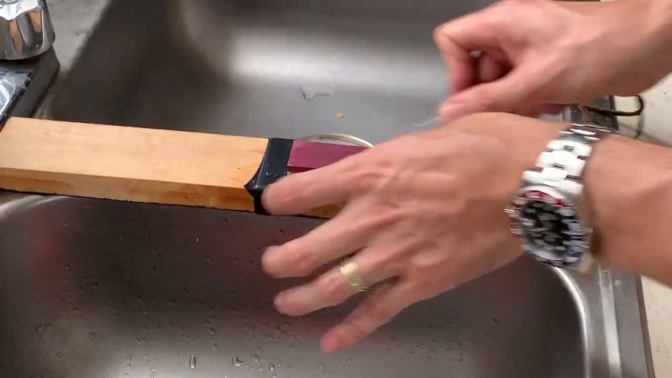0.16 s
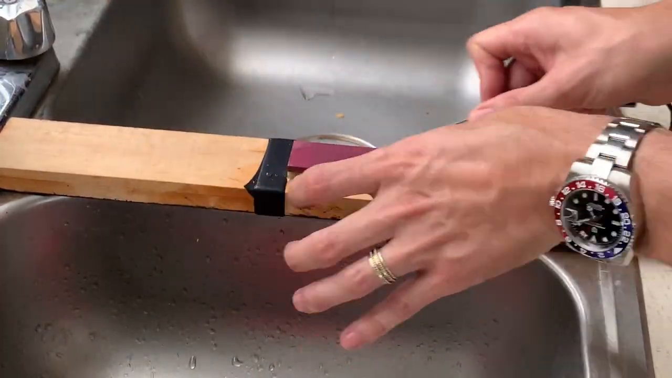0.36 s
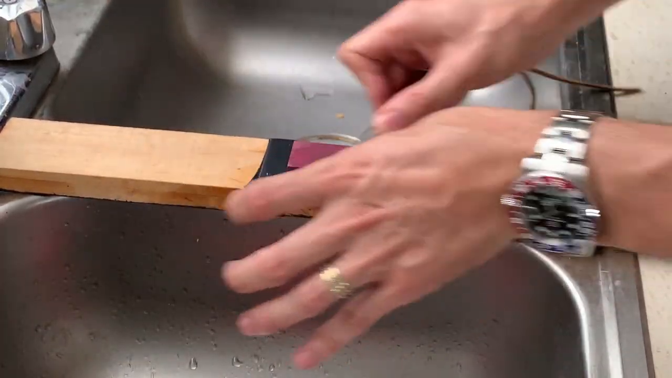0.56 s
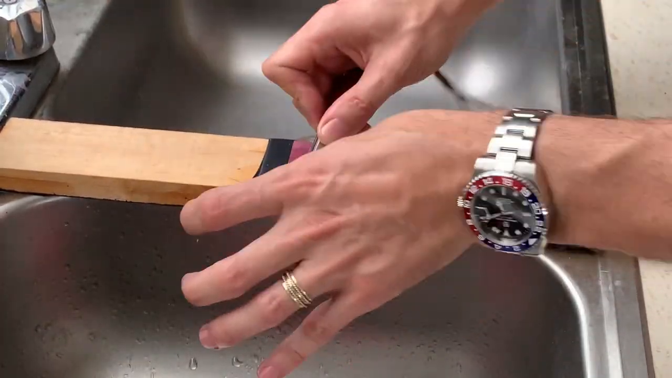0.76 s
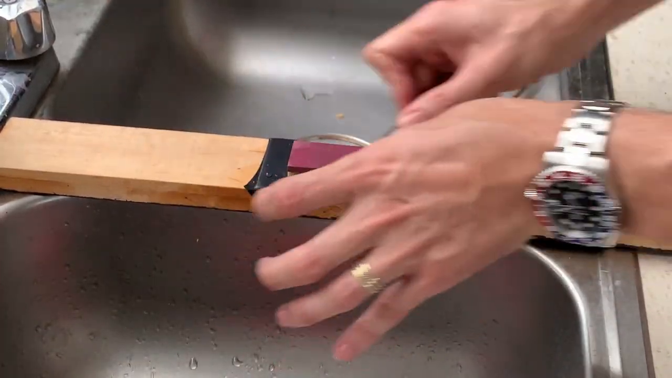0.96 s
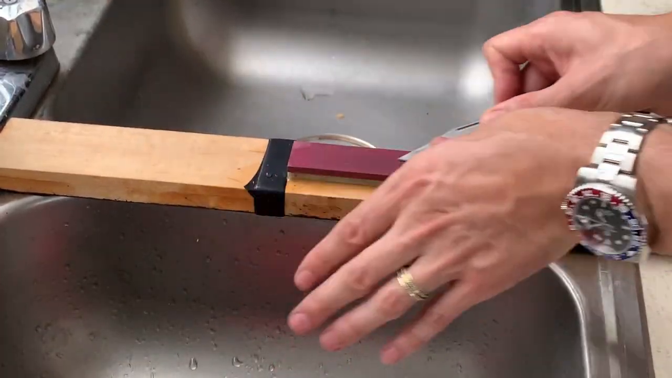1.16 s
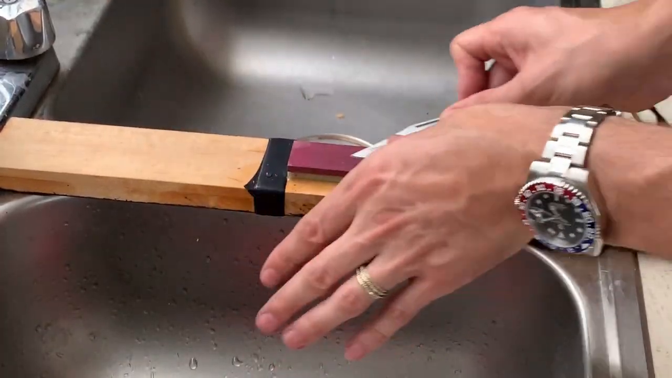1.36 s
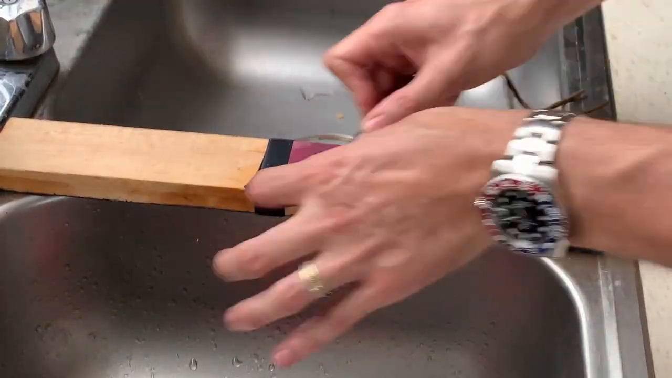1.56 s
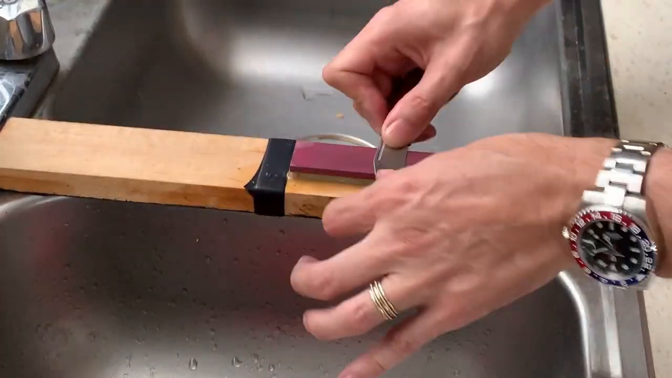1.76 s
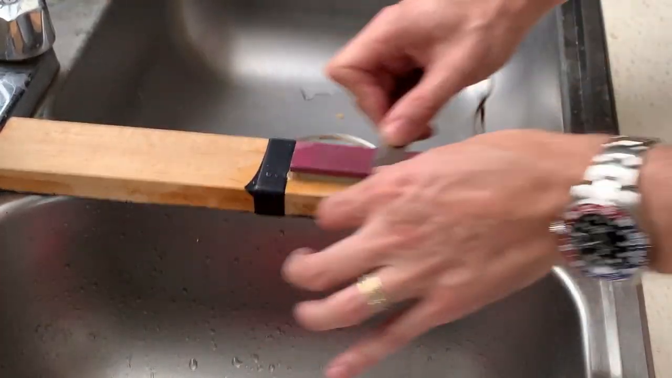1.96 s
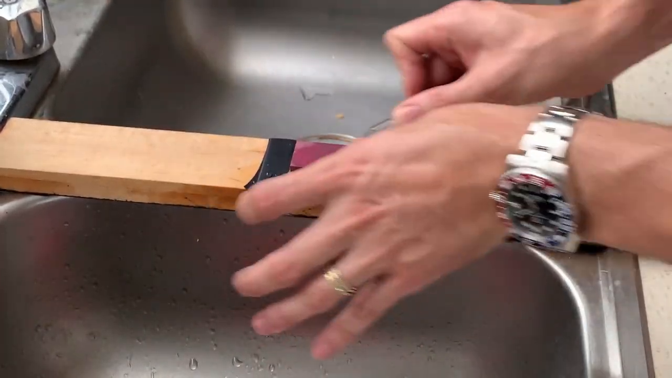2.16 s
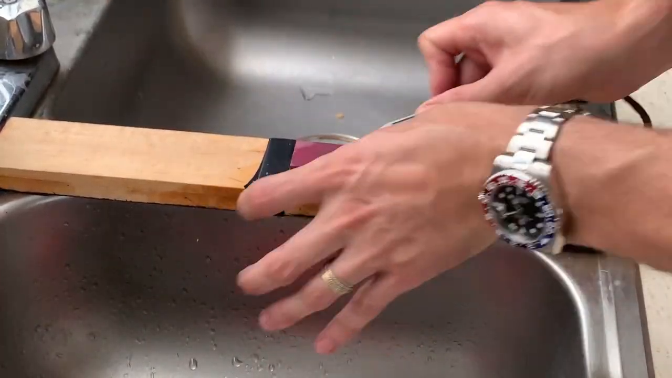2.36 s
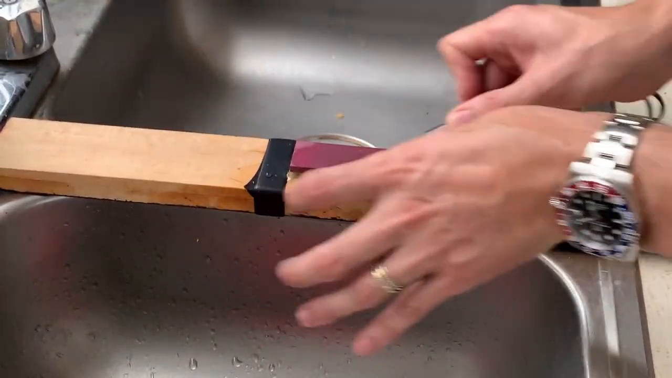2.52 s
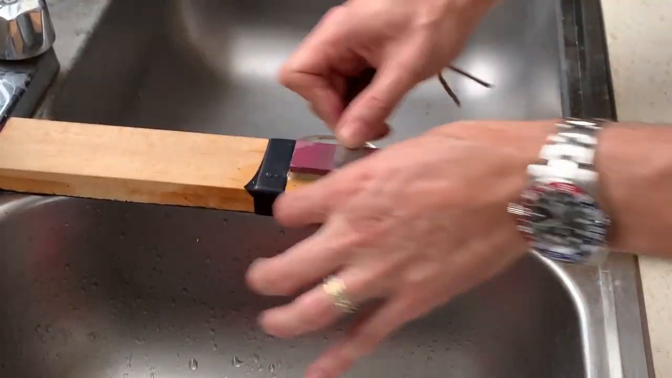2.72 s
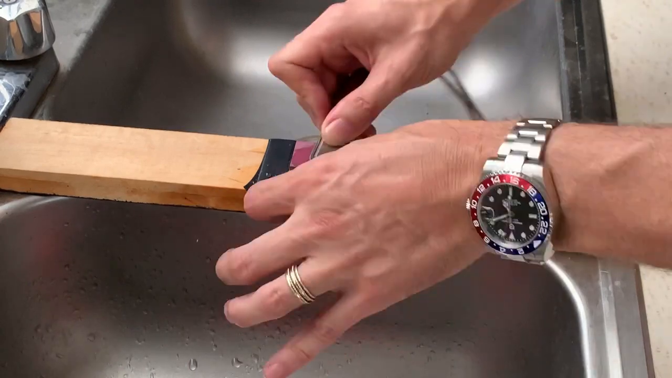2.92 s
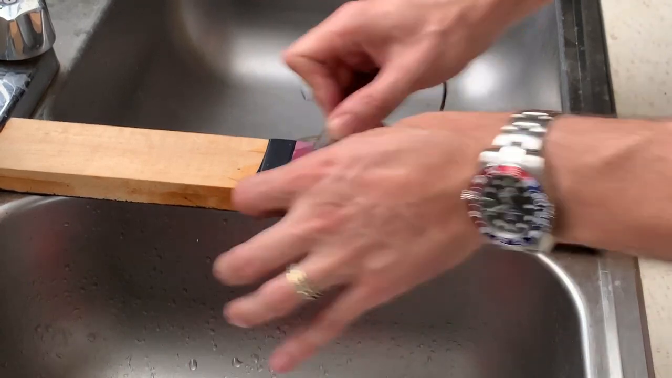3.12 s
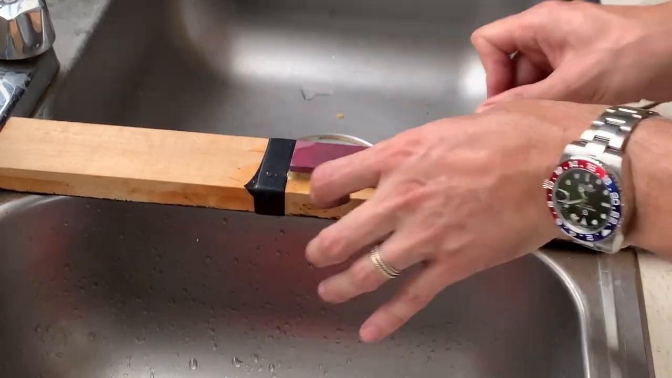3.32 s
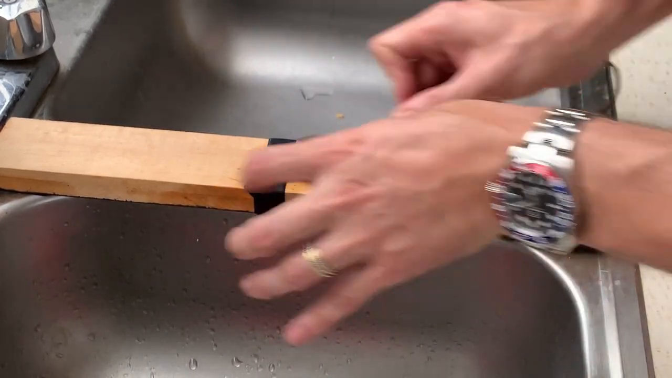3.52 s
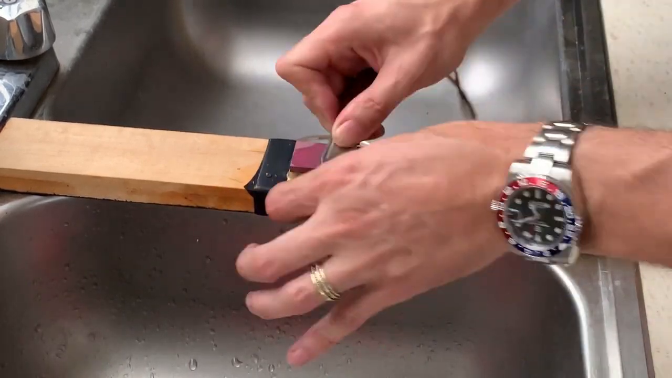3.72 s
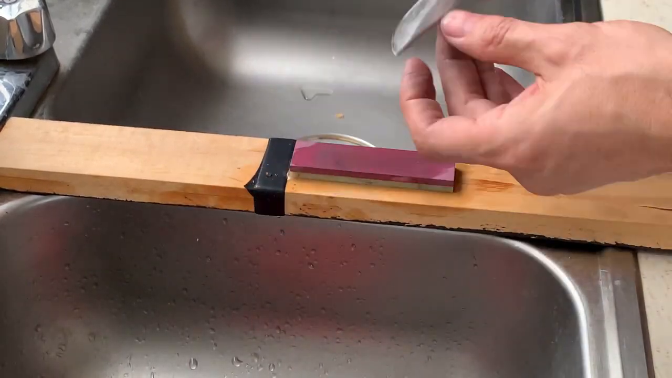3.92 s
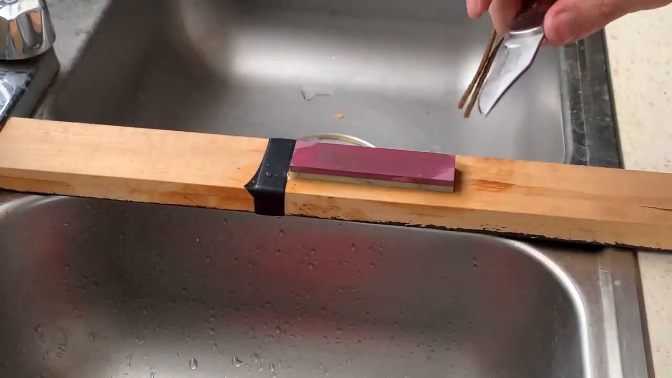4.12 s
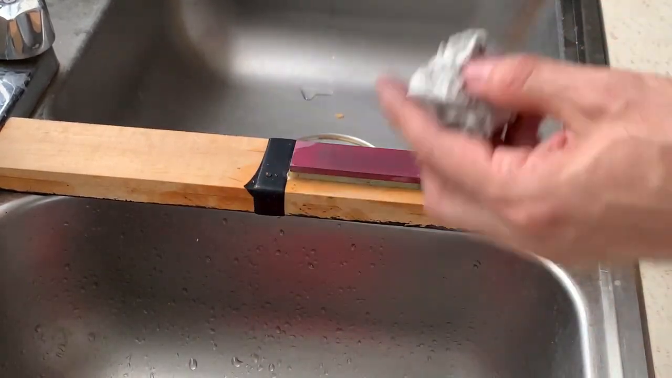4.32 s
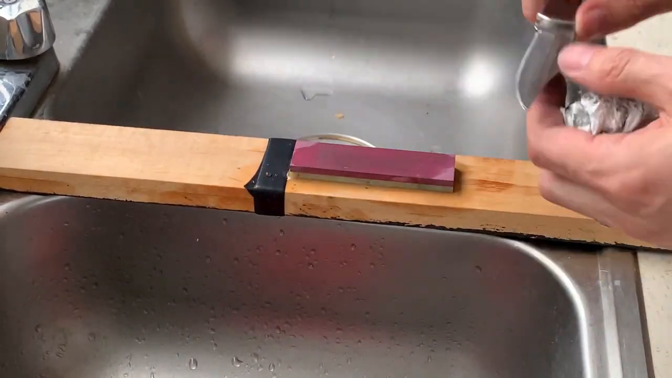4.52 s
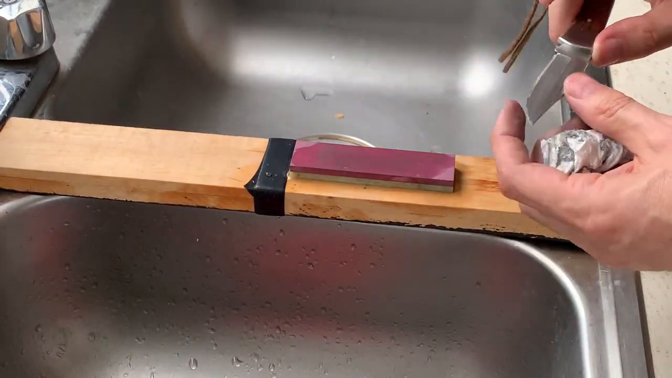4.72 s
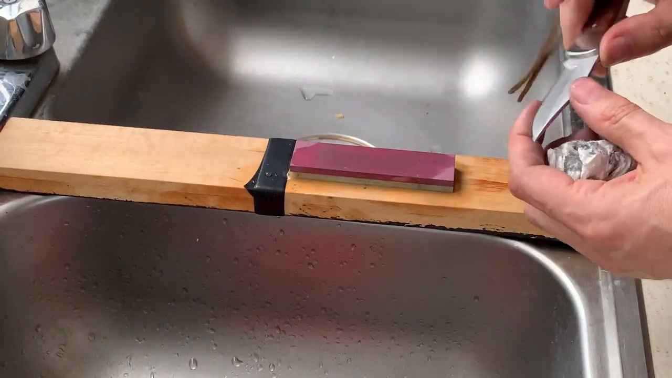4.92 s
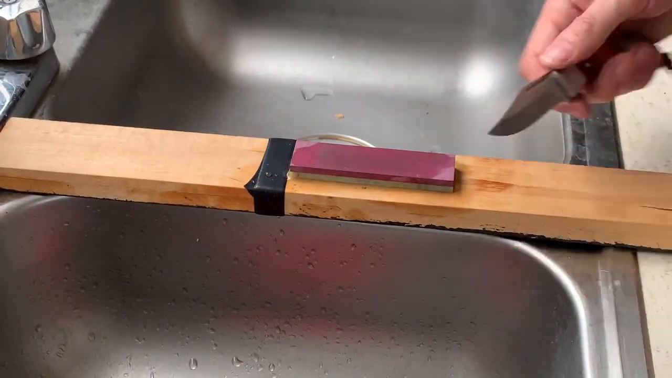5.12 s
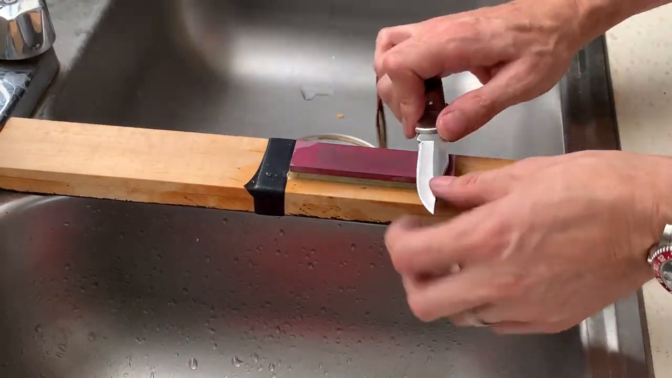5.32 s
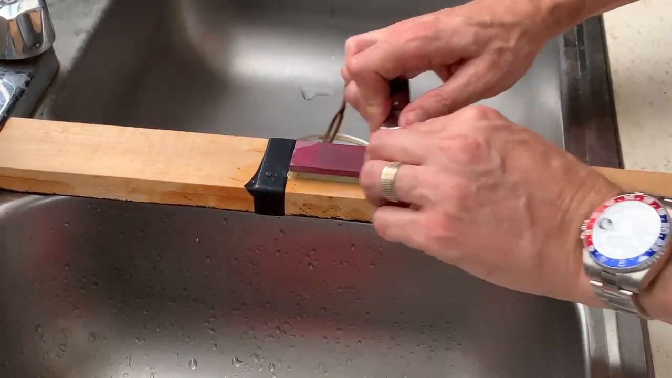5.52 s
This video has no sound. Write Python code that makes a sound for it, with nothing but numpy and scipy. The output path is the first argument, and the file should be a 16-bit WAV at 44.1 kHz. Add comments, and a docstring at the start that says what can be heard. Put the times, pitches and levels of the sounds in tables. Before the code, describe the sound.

A knife blade scrubs rapidly on a whetstone with a gritty, chattering rasp, pauses, then taps down and briefly resumes.

```python
"""Knife on a whetstone

A small knife is scrubbed on a stone fixed to a board across a steel sink, about 21 strokes a second,
while the contact sweeps along the edge and back once a second. Crushed grit hisses, and stick-slip
friction makes the edge chatter on every push, at times catching hard. The blade is lifted, handled
with a paper towel and set down with a tap; the scrubbing resumes briefly in the quiet kitchen."""
import sys
import numpy as np
from scipy import signal
from scipy.fft import rfft, irfft, next_fast_len
from scipy.io import wavfile
from scipy.ndimage import uniform_filter1d

SR = 44100
rng = np.random.default_rng(int(sys.argv[2]) if len(sys.argv) > 2 else 0)


def unload_audio(sound):
    """Save the sound as a 16-bit wav file, at the path given as the first command line argument."""
    columns = np.transpose(np.atleast_2d(sound))
    # keep every value between -1 and 1, then stretch to whole-number steps
    steps = np.round(np.clip(columns, -1, 1) * 32767)
    wavfile.write(sys.argv[1], SR, steps.astype(np.int16))


N = 250488
TIME = np.arange(N) / SR
FFT_SIZE = next_fast_len(N + SR // 4)
HZ = np.fft.rfftfreq(FFT_SIZE, 1 / SR)

# The hand's pace in each spell of scrubbing: t/s, half strokes done (odd push, even pull)
HAND_PACE = [
    [(0.006, 1), (0.275, 12), (1.213, 52), (1.437, 62), (2.505, 107), (2.891, 123), (3.545, 151),
     (3.901, 166)],
    [(5.52, 1), (5.595, 2), (5.685, 5)],
]
# The slow sweep in each spell: t/s, place of contact (0 belly, 1 tip), pressure/dB
EDGE_SWEEP = [
    [(0.05, 0.45, 1), (0.22, 0.14, -2.5), (0.48, 0.3, -1.5), (0.72, 0.91, -1), (0.87, 0.54, 0.5),
     (1.38, 0.22, -2), (1.68, 0.74, -1), (2.0, 0.8, -1), (2.3, 0.0052, 1), (2.64, 0.27, 0), (2.75, 1, -2.5),
     (2.86, 0.66, 0), (3.15, 0.65, 0), (3.42, 0, -0.5), (3.6, 0.38, -0.5), (3.8, 0.91, 0), (3.9, 0.53, 1)],
    [(5.55, 0, 5), (5.595, 0.21, -1), (5.645, 0.92, 3.5), (5.68, 1, -8)],
]
# Edge on the stone: start/s, end/s
CONTACT_SPANS = [(-.05, 3.902), (5.527, 5.75)]
# Envelopes of the continuous friction: t/s, level/dB
HISS_LEVEL = [(0, -44.5), (.22, -51), (.37, -51), (.52, -47.5), (.75, -48), (1.0, -48), (1.27, -49.5),
              (1.42, -49.5), (1.6, -46.5), (1.76, -46), (1.95, -48), (2.42, -49), (2.6, -49), (2.72, -47),
              (2.96, -45), (3.15, -48), (3.3, -47.5), (3.45, -50), (3.56, -48.5), (3.75, -47), (3.9, -47),
              (5.54, -47), (5.593, -51), (5.645, -41.5), (5.68, -43.5)]
RASP_LEVEL = [(0, -49), (.3, -56), (.52, -42), (.75, -59), (.95, -66), (1.06, -44.5), (1.38, -60.5),
              (1.55, -42.5), (1.7, -49), (1.95, -65), (2.1, -64), (2.19, -44), (2.42, -48.5), (2.64, -43.5),
              (2.73, -53), (2.82, -43.5), (2.92, -50), (3.0, -57), (3.22, -57.5), (3.35, -47.5),
              (3.45, -54.5), (3.9, -58.5)]
THRUM_LEVEL = [(0, -62), (1.4, -62.5), (2.0, -57), (2.35, -63.5), (2.62, -58.5), (3.15, -55), (3.6, -64),
               (3.83, -50.5), (3.9, -66)]
# Pushes on which the edge catches: t/s, level/dB, relative level of the crack/dB, build-up/s
HARD_CATCHES = [(0.014, -24.5, -21, .007), (.066, -31.5, -9.5, .011), (.118, -28.5, -11, 0.0086),
                (0.2619, -26.5, -14.5, 0.008), (.311, -29.5, -9, 0.0077), (0.400, -25.5, -15, 0.0073),
                (0.4495, -31.5, -2.5, .009), (.496, -37.5, -4.5, .008), (0.5216, -27.5, -15.5, .004),
                (0.5403, -29.5, -5.5, .011), (.617, -27, -12.5, 0.00827), (0.727, -32.5, -17, .007),
                (0.8324, -21, -13, .005), (0.8707, -25.5, -11, 0.0077), (1.061, -26, -23, .012),
                (1.194, -23, -25.5, 0.00559), (1.2433, -25, -22.5, 0.0078), (1.318, -28, -12.5, 0.005),
                (1.4727, -22, -23, 0.0077), (1.518, -25, -28, 0.0074), (1.564, -35.5, 3, 0.011),
                (1.663, -27, -6, .011), (1.7669, -24, -7.5, 0.0069), (1.858, -21.5, -9.5, 0.0072),
                (2.082, -25.5, -19, .005), (2.139, -29, -18, 0.012), (2.186, -32, -11.5, 0.011),
                (2.234, -28.5, -10, 0.0077), (2.279, -25.5, -10, 0.01), (2.326, -26, -11.5, 0.0097),
                (2.379, -29, -7, 0.015), (2.421, -31, -8.5, .01), (2.469, -27, -12, .011),
                (2.510, -27, -9.5, 0.0083), (2.568, -27, -7, 0.01), (2.6158, -28, -7.5, 0.0074),
                (2.663, -31, -12.5, .008), (2.8076, -20.5, -8.5, .008), (2.8601, -18.5, -13.5, .006),
                (2.907, -22.5, -6, .01), (2.924, -31, -7.5, .008), (2.948, -33, -4.5, 0.0071),
                (3.003, -28.5, -9, 0.0083), (3.123, -26, -13.5, 0.0075), (3.1701, -24.5, -13, .007),
                (3.217, -28, -21, .005), (3.259, -26.5, -18, 0.0076), (3.326, -26.5, -16.5, 0.0078),
                (3.4151, -26, -27, 0.0068), (3.461, -23.5, -19, 0.0071), (3.504, -25, -16.5, 0.0079),
                (3.557, -22, -13, 0.0105), (3.706, -23, -9, 0.0075), (3.7989, -19, -16, .006),
                (5.536, -29.5, -25, 0.0059), (5.561, -27, -13.5, 0.0069), (5.615, -24.5, -17, 0.008),
                (5.6596, -24, -16.5, .004)]
# Friction tones: t/s, level/dB
CLEAR_SINGS = [(.059, -41), (.107, -40.5), (.483, -40.5), (.53, -41.5), (.866, -37), (1.184, -35.5),
               (2.13, -39), (2.323, -35.5), (2.372, -39.5), (2.423, -39), (2.464, -41), (2.513, -36.5),
               (3.163, -44), (3.496, -42.5)]
SQUEAKS = [(0.012, -37), (1.851, -36.5), (2.32, -40), (2.373, -36), (3.555, -34), (3.703, -34)]
# Brief impacts: t/s, level/dB, decay/s
GRAIN_SNAPS = [(.0145, -33, 0.0032), (.8715, -30, 0.003), (1.8545, -26, 0.0023), (2.081, -41, 0.0016),
               (2.8045, -26, 0.005), (2.8575, -36.5, 0.0033), (2.906, -31, .005), (3.705, -34, .003),
               (3.7995, -29.5, 0.0042), (5.566, -32.5, .001)]
STONE_KNOCKS = [(.209, -45, .004), (.405, -41, .004), (.87, -42, .005), (1.015, -40, 0.008),
                (1.187, -41, 0.0056), (1.471, -33, 0.005), (1.522, -33.5, 0.006), (2.083, -40, 0.005),
                (2.131, -40.5, .005), (3.405, -40, .005), (3.46, -39, .005), (3.508, -43, .005)]
LANDING_TAPS = [(5.3342, -26.5, 0.0023), (5.339, -36, 0.009), (5.35, -43, 0.0064), (5.370, -47, 0.002),
                (5.398, -51.5, 0.0059), (5.411, -53, 0.0046)]
# Fingers and paper on the blade: t/s, duration/s, swish level/dB, bump level/dB
TOUCHES = [(4.253, 0.0062, -70, -72), (4.24, 0.062, -78.5, -68), (4.352, 0.054, -88, -59.5),
           (4.391, 0.066, -91, -63.5), (4.475, 0.056, -73, -71), (4.55, .035, -92, -66),
           (5.214, 0.013, -75, -73.5)]

# Broad spectra of the sources: f/Hz, relative spectral level/dB
BOARD_SPECTRUM = [(30, -39.5), (130, -51), (230, -26), (340, -6.5), (700, 2.5), (1080, -5.5), (1450, 5),
                  (1950, -4.5), (2300, -5.5), (2950, -15.5), (4500, -21.5), (9000, -45.5)]  # stone and board together
GRIT_SPECTRUM = [(300, -24.5), (1500, -17.5), (3200, -10), (4400, -7.5), (5500, 0), (6600, 4), (7600, -2),
                 (9500, 2), (11200, -8.5), (12800, -7.5), (14000, -2.5), (14600, -5.5), (16000, -7.5)]
RASP_SPECTRUM = [(600, -37), (1500, -11.5), (2100, 3.5), (2500, -3), (2900, -8.5), (3600, -24.5),
                 (6000, -30)]
SINK_SPECTRUM = [(30, -31), (140, -39), (190, -9), (250, -3.5), (310, 6), (450, -14), (1200, -60)]
SNAP_SPECTRUM = [(200, -14.5), (900, -11), (2200, 14.5), (2700, 3), (3600, -1), (5000, -1), (8000, -1),
                 (16000, -15.5)]
TAP_SPECTRUM = [(100, -52), (200, -34), (450, -22), (1000, -15.5), (1450, 1), (1750, 3.5), (2150, -14),
                (3200, -17), (4400, -16.5), (5300, -24), (8300, -22), (11000, -35), (16000, -32)]
SKID_SPECTRUM = [(800, -15), (2800, -3), (4000, 0), (6300, -1), (9000, -11), (15000, -16)]
SWISH_SPECTRUM = [(500, -13), (2500, -7), (5000, -6), (9000, -5.5), (15000, -6.5)]
BUMP_SPECTRUM = [(60, -36), (200, -24), (420, 10), (700, -3), (1300, -19), (4000, -39)]
AIR_SPECTRUM = [(15, -71), (25, -36), (160, -36.5), (183, -18.5), (297, -14.5), (378, -2), (537, -3),
                (582, -7.5), (631, -3.5), (782, -9), (919, -10), (1110, -13), (2490, -29), (15500, -40)]
HOLLOW_SPECTRUM = [(100, -40.5), (300, -6.5), (620, -3.5), (1000, -11), (3000, -38)]
# Resonances of the bodies: f/Hz, bandwidth/Hz, lift/dB
CONTACT_RESONANCES = [(403.4, 36.7, 17.33), (466, 13, 7.6), (542.5, 18, 7.8), (623.3, 22.6, 7.9),
                      (924, 54.4, 15.9), (1145, 42, 8.1), (1273, 43, 8.5), (1701, 108, 13.94),
                      (2112, 210, 7.8), (2734, 86, 13), (3076, 48, 8.5)]  # stone and board with the blade pressed on them
BLADE_RESONANCES = [(3506, 110, 13.1), (3930, 150, 11), (4720, 70, 9.6), (4825, 45, 6), (5220, 47, 13),
                    (5290, 57, 7.5), (5760, 90, 7), (6380, 50, 7.8), (6550, 240, 4.9), (6820, 44, 6),
                    (7300, 80, 5.2), (7260, 130, 6), (8195, 130, 9), (8730, 110, 7.2), (9050, 77, 9),
                    (9310, 110, 10.3), (9520, 70, 9.8), (9930, 100, 4.5), (10750, 110, 8.2),
                    (11900, 116, 5.5)]
SINK_RESONANCES = [(191.8, 11, 16), (235, 19, 8.9), (279.7, 12, 14)]
HOLLOW_RESONANCE = [(407.3, 37, 21)]  # the board's hollow ring
# Free vibration after the blade lands: f/Hz, level/dB, T60/s
LANDING_MODES = [(1390, -56, .04), (1630, -54, .035), (2710, -49, 0.1)]
# Changes of colour: f/Hz, gain/dB
BELLY_GAIN = [(2500, -2), (4100, -0.5), (5500, 0.5), (9000, -1)]  # grit under the belly
NEW_ANGLE_GAIN = [(200, -1), (400, -3.5), (850, 2), (1700, -0.5), (2200, 1.5), (2700, -2), (3700, 4.5),
                  (6000, -1.5), (8000, -3), (9300, -9), (11000, -2), (15000, -4)]  # scrubbing after the blade is set down again
MICROPHONE_GAIN = [(40, -7), (100, -6), (150, 0)]
# Stereo width: f/Hz, gain of the side signal/dB
WORK_WIDTH = [(60, 0.5), (200, -19), (700, -19), (1400, -21.5), (2400, -14), (4400, -2), (5600, -4.5),
              (7500, -3.5), (10000, -23.5), (15000, -13)]
AIR_WIDTH = [(60, -2), (110, 0.5), (200, -18.5), (380, -10.5), (700, -11.5), (1290, -9), (2380, -2.5),
             (4400, -0.5), (8120, -3.5), (15000, -10)]
# Reverberation time of the kitchen: f/Hz, T60/s
ROOM_T60 = [(200, .28), (1000, .19), (1800, .15), (4000, .14), (14000, .11)]

BLADE_SHIFT, BOARD_SHIFT = .0015, .011  # fractional swing of the resonances as the contact moves
SHIFTING_HZ = (1000, 2400)  # band in which the stone's resonances move
TOP_HZ = 15850  # upper band limit


def scrubbing():
    """Sliding friction follows the hand's speed: weaker at each turn, stronger on the push."""
    half_strokes = np.interp(TIME, *np.vstack(HAND_PACE).T) + 0.046  # friction leads the hand
    speed = np.abs(np.sin(np.pi * half_strokes))
    push = np.floor(half_strokes) % 2
    place, press_db = sweep(TIME)
    touching = sum(np.clip(np.minimum(TIME - on, off - TIME) / 0.033 + .5, 0, 1)
                   for on, off in CONTACT_SPANS) ** 2
    # the grit varies from stroke to stroke and comes in clumps
    grit = grit_hiss(place, press_db)
    stroke_db = .7 * rng.standard_normal(SR)[half_strokes.astype(int)]
    clumps = unit(amp(stroke_db + wobble(per_s=110)))
    grit *= touching * clumps * (0.36 + 0.65 * speed) * amp(2.0 * (push - 1))
    # drag shakes the stone, more brightly under pressure
    drag = touching * (0.73 + speed * (0.11 + 0.42 * push))
    stone = stone_vibration(drag * amp(-41.5 - 0.5 * place + press_db))
    treble = tinted(stone, 1 / (1 + (2200 / (HZ + 1)) ** 8))
    stone += (amp(0.58 * press_db) - 1) * treble
    # where the edge digs in, it rasps at the height of the push
    digging = touching * amp(envelope(RASP_LEVEL)) * (0.28 + 0.71 * push * speed ** 2)
    rasp = digging * friction(response(RASP_SPECTRUM, []), grains_per_s=260, spread_db=1.5)
    scrape = grit + rasp + stone
    at_new_angle = tinted(scrape, amp(along(NEW_ANGLE_GAIN, HZ)))
    scrape = np.where(TIME > LANDING_TAPS[0][0], at_new_angle, scrape)
    return scrape + sink_thrum(touching, speed)


def sweep(times):
    """The contact travels along the edge: its place and pressure/dB at the given times."""
    knots, place, press_db = np.vstack(EDGE_SWEEP).T
    return np.interp(times, knots, place), np.interp(times, knots, press_db)


def friction(ring, grains_per_s, spread_db):
    """Random excitation: countless tiny slips, clumped into grains, drive a body; rms 1."""
    clumps = amp(spread_db * wobble(grains_per_s))
    return unit(signal.oaconvolve(clumps * rng.standard_normal(N), ring)[:N])


def grit_hiss(place, press_db):
    """Abrasion: crushed grit rings the steel, and the finest hiss grows towards the tip."""
    belly = tinted(blade_friction(-BLADE_SHIFT), amp(along(BELLY_GAIN, HZ)))
    tip = blade_friction(BLADE_SHIFT)
    blend = np.pi / 2 * np.clip(place, 0, 1)
    grit = np.cos(blend) * belly + np.sin(blend) * tip
    grit = patchy(grit, depth_db=2, size=1024)  # resonances come and go as the fingers shift
    grit = patchy(grit, depth_db=1.6, size=256)  # the grit varies in colour
    high_pass = 1 / (1 + (10300 / (HZ + 1)) ** 16)
    body = unit(tinted(grit + amp(-11) * coarse_grains(), 1 - high_pass))
    # as the hiss sinks it also dulls around 3840 Hz
    hiss_db = envelope(HISS_LEVEL)
    keen_band = tinted(body, np.exp(-(np.log((HZ + 1) / 3840) / 0.27) ** 2))
    body += (amp(0.3 * (hiss_db - hiss_db.mean())) - 1) * keen_band
    fine_db = -59.5 + 11.5 * place + press_db
    return amp(hiss_db) * body + amp(fine_db) * unit(tinted(grit, high_pass))


def blade_friction(shift):
    """Forced vibration of the steel on grit, its resonances moved by the fraction shift."""
    modes = np.array(BLADE_RESONANCES) * [1 + shift, 1, 1]
    return friction(response(GRIT_SPECTRUM, modes), grains_per_s=450, spread_db=1.1)


def coarse_grains(per_s=1000, middle_hz=6600, decay_cycles=3.5, count=6000, size=128):
    """Shot noise: grains crack at random, each a damped sinusoid of its own pitch and strength."""
    gaps, luck = rng.exponential(size=(2, count))
    hz = np.clip(middle_hz * np.exp(.28 * rng.standard_normal((count, 1))), 1500, TOP_HZ)
    cycles = hz * np.arange(size) / SR
    strength = amp(3 * np.minimum(luck, np.pi))[:, None]
    grains = strength * np.sin(2 * np.pi * cycles) * np.exp(-cycles / decay_cycles)
    samples = (np.cumsum(gaps) / per_s * SR).astype(int)[:, None] + np.arange(size)
    return unit(np.bincount(samples.ravel(), grains.ravel(), N)[:N])


def stone_vibration(force):
    """Forced vibration of stone and board, whose resonances wander as the contact moves."""
    blend = np.pi / 2 * np.clip(.5 + .5 * wobble(per_s=20), 0, 1)
    out = np.zeros(N)
    for share, shift in [(np.cos(blend), -BOARD_SHIFT), (np.sin(blend), BOARD_SHIFT)]:
        slips = share * force * friction([1], grains_per_s=350, spread_db=2.5)
        out += signal.oaconvolve(slips, stone_ring(shift))[:N]
    return out


def stone_ring(shift):
    """Impulse response of stone and board, the middle resonances moved by the fraction shift."""
    low, high = SHIFTING_HZ
    modes = [(hz * (1 + shift * (low < hz < high)), width, db) for hz, width, db in CONTACT_RESONANCES]
    return response(BOARD_SPECTRUM, modes)


def sink_thrum(touching, speed):
    """Structure-borne sound: each reversal of the hand jolts the sink's low resonances."""
    jolt = touching * (0.47 + 0.98 * (1 - speed))
    force = jolt * amp(envelope(THRUM_LEVEL)) * friction([1], grains_per_s=470, spread_db=0)
    return signal.fftconvolve(force, response(SINK_SPECTRUM, SINK_RESONANCES))[:N]


def catches(pull_delay_s=.023):
    """Static friction grips the edge on each push: it chatters, knocks the board and crushes grit."""
    out, rows = np.zeros(N), pushes()
    blade = response(GRIT_SPECTRUM, BLADE_RESONANCES)
    boards = [stone_ring(shift)[:SR // 14] for shift in np.linspace(-BOARD_SHIFT, BOARD_SHIFT, 5)]
    grips = [(s, db, db + crack_db, swell) for s, db, crack_db, swell in HARD_CATCHES]
    hard_times = np.transpose(HARD_CATCHES)[0]
    scatter_db = 1.5 * rng.standard_normal((len(rows), 3))
    for (s, place, press_db), luck in zip(rows, scatter_db):
        grip_db, crack_db, pull_db = press_db + luck + [-32.5 - 2 * place, -46.5, -37.5 - 1.2 * place]
        if np.abs(hard_times - s).min() > .027:  # an ordinary push grips lightly
            grips.append((s, grip_db, crack_db, 0.00905))
        # softer, longer chatter on the pull, while the edge stays on the stone
        if any(on < s + 2 * pull_delay_s < off for on, off in CONTACT_SPANS):
            pull = chatter(boards[rng.integers(len(boards))], slip_hz=1701, jitter=0.08, swell=.012)
            delay = pull_delay_s + .005 * rng.standard_normal()
            add(out, s + delay - .012, amp(pull_db) * pull)
    for s, db, crack_db, swell in grips:
        board = boards[rng.integers(len(boards))]
        judder = chatter(board, slip_hz=1697.4, jitter=0.071, swell=swell)
        add(out, s - swell / 2, amp(db - 3.5) * judder)
        add(out, s - .004, amp(db - 8) * burst(board, rise=0.0063, decay=0.0041))
        add(out, s - .003, amp(crack_db - 2.5) * burst(blade, rise=0.003, decay=0.0051))
    return out


def pushes():
    """Sticking sets in near the middle of each push; rows of t/s, place of contact, pressure/dB."""
    times = []
    for spell in HAND_PACE:
        s, half_strokes = np.transpose(spell)
        starts = np.arange(half_strokes[0], half_strokes[-1], 2)
        grips = starts + .56 + .12 * rng.standard_normal(len(starts))
        times.extend(np.interp(grips, half_strokes, s))
    return np.column_stack([times, *sweep(times)])


def chatter(board, slip_hz, jitter, swell, count=44):
    """Stick-slip pulses near the stone's main resonance build up until the edge breaks free."""
    gaps = np.exp(jitter * rng.standard_normal(count) + .014 * rng.standard_normal()) / slip_hz
    t = np.cumsum(gaps)
    force = (t / swell) ** 2 * np.exp(-(t / swell) ** 4)
    pulses = np.bincount(np.round(t * SR).astype(int), force)
    return peak_one(signal.fftconvolve(pulses, board))


def singing(sing_hz=922, sing_s=0.031, glide=0.017):
    """Self-excited oscillation: the stone sings on each push, and a few hard catches squeak."""
    out, rows = np.zeros(N), pushes()
    for (s, place, press_db), (luck, detune) in zip(rows, rng.standard_normal((len(rows), 2))):
        db = -46.5 - 7 * place + press_db - luck  # strongest under the belly
        add(out, s - .007, amp(db) * tone(sing_hz * (1 + 0.013 * detune), sing_s, glide, rough=0.02))
    for s, db in CLEAR_SINGS:
        hz = sing_hz * (1 + 0.0056 * rng.standard_normal())
        add(out, s, amp(db) * tone(hz, sing_s, glide, rough=0.013))
    for s, db in SQUEAKS:
        add(out, s, amp(db) * tone(hz=2086, length=0.016, glide=-0.092, rough=0.02))
    # the slow first push on restarting groans
    add(out, CONTACT_SPANS[1][0], amp(-39.5) * tone(hz=888, length=0.067, glide=.1, rough=0.045))
    return out


def tone(hz, length, glide, rough):
    """Stick and slip lock into a short, slightly rough tone that glides by a fraction of its pitch."""
    progress = np.linspace(0, 1, round(length * SR))
    drift = np.cumsum(rng.standard_normal(SR // 4))[:len(progress)] * rough
    phase = 2 * np.pi * np.cumsum(hz * (1 + glide * (progress - .5))) / SR + drift
    return np.sin(np.pi * progress ** 0.59) * np.sin(phase)


def grain_snaps():
    """Brittle fracture: a coarse grain cracks and the steel blade rings with a bright clink."""
    clink_modes = [mode for mode in CONTACT_RESONANCES if mode[0] > SHIFTING_HZ[1]]
    return impacts(GRAIN_SNAPS, response(SNAP_SPECTRUM, list(BLADE_RESONANCES) + clink_modes))


def stone_knocks():
    """Impact: a heavy push rocks the stone on the board, which rings hollow."""
    return impacts(STONE_KNOCKS, response(HOLLOW_SPECTRUM, HOLLOW_RESONANCE))


def touch_down():
    """Damped free vibration: the blade lands on the stone, rings, skids over the grit and settles."""
    out = impacts(LANDING_TAPS, response(TAP_SPECTRUM, []))
    t = np.arange(SR // 2) / SR
    ring = sum(amp(db - 60 * t / t60) * np.sin(2 * np.pi * hz * t) for hz, db, t60 in LANDING_MODES)
    blade = response(SKID_SPECTRUM, BLADE_RESONANCES)
    grit = unit(signal.fftconvolve(rng.standard_normal(len(t)), blade)[:len(t)])
    skid = amp(-56) * np.clip(1 - t / 0.037, 0, 1) * grit
    add(out, LANDING_TAPS[0][0], (ring + skid) * (1 - np.exp(-t / 0.0045)))
    return out


def impacts(table, ring):
    """Impulsive excitation of a body, once for each row of t/s, level/dB, decay/s."""
    out = np.zeros(N)
    for s, db, decay in table:
        add(out, s, amp(db) * burst(ring, rise=0.0014, decay=decay))
    return out


def burst(ring, rise, decay, size=2048):
    """Transient response of a body to a short run of slips."""
    t = np.arange(size) / SR
    force = np.minimum(t / rise, 1) * np.exp(-np.maximum(t - rise, 0) / decay)
    return peak_one(signal.fftconvolve(force * rng.standard_normal(size), ring))


def handling():
    """Soft contact: fingers and paper brush the lifted blade with swishes and dull bumps."""
    out, swish, bump = np.zeros(N), noise(SWISH_SPECTRUM), noise(BUMP_SPECTRUM)
    for s, length, swish_db, bump_db in TOUCHES:
        touch = np.sin(np.pi * np.clip((TIME - s) / length, 0, 1))
        out += touch * (amp(swish_db) * swish + amp(bump_db) * bump)
    return out


def sink_reflections(x, decay, size=2048):
    """Early reflections off the sink scatter the phase and leave the colour even."""
    walls = rfft(rng.standard_normal(size) * np.exp(-np.arange(size) / SR / decay))
    scatter = irfft(walls / np.abs(walls))
    return signal.fftconvolve(x, scatter[:size // 2])[:N]


def kitchen_reverb(x, width):
    """Reverberation decays exponentially, faster in the treble, much alike at both microphones."""
    hz, t, spectra = signal.stft(rng.standard_normal((2, SR // 2)), SR, nperseg=256)
    decay = amp(-60 * t / along(ROOM_T60, hz)[:, None])
    mid, side = signal.istft(spectra * decay, SR, nperseg=256)[1]
    tail = np.array([mid + width * side, mid - width * side])
    delayed = np.pad(x, (round(.005 * SR), 0))
    return signal.fftconvolve(delayed[None], tail / np.linalg.norm(tail[0]), axes=1)[:, :N]


def kitchen_air(db):
    """Stationary noise: the steady hum of air in the kitchen."""
    mid = noise(AIR_SPECTRUM)
    side = tinted(noise(AIR_SPECTRUM), amp(along(AIR_WIDTH, HZ)))
    return amp(db) * np.array([mid + side, mid - side])


def response(spectrum, modes, size=8192):
    """Minimum-phase impulse response of energy 1: a broad spectrum lifted by resonances."""
    hz = np.fft.rfftfreq(size, 1 / SR)
    lift = sum((amp(db) ** 2 - 1) / (1 + (2 * (hz - f) / width) ** 2) ** 1.68 for f, width, db in modes)
    magnitude = amp(along(spectrum, hz)) * np.sqrt(np.abs(1 + lift))
    cepstrum = irfft(np.log(magnitude))
    cepstrum[1:size // 2] *= 2  # folding the cepstrum makes the response causal
    cepstrum[size // 2 + 1:] = 0
    ring = irfft(np.exp(rfft(cepstrum)))
    return ring / np.linalg.norm(ring)


def patchy(x, depth_db, size):
    """Random spectral modulation: a larger size gives longer, narrower patches of colour."""
    spectra = signal.stft(x, nperseg=size)[2]
    field = uniform_filter1d(rng.standard_normal(spectra.shape), size=9, axis=0)
    field = uniform_filter1d(field, size=5, axis=1)
    return unit(signal.istft(spectra * amp(depth_db * unit(field)), nperseg=size)[1][:N])


def wobble(per_s):
    """Random modulation: straight lines between Gaussian knots."""
    knots = rng.standard_normal(N // 16)
    return np.interp(TIME * per_s, np.arange(len(knots)), knots)


def noise(spectrum):
    """Filtered white noise of rms 1."""
    return unit(tinted(rng.standard_normal(N), amp(along(spectrum, HZ))))


def tinted(x, gain):
    """Zero-phase filtering with a gain for each frequency."""
    return irfft(rfft(x, FFT_SIZE) * gain, FFT_SIZE)[..., :N]


def along(points, hz):
    """Interpolation of (f/Hz, value) points on a logarithmic frequency axis."""
    f, values = np.transpose(points)
    return np.interp(np.log(hz + 1), np.log(f + 1), values)


def envelope(points):
    """Linear interpolation of (t/s, level/dB) points."""
    return np.interp(TIME, *np.transpose(points))


def add(track, s, sound):
    """Superposition of a sound on the track at time s."""
    part = track[max(round(s * SR), 0):][:len(sound)]
    part += sound[:len(part)]


def peak_one(sound, size=88):
    """Normalisation of a burst so that its loudest two milliseconds peak near 1."""
    return sound / (2 * np.sqrt(uniform_filter1d(sound ** 2, size).max()))


def unit(x):
    """Normalisation to rms 1."""
    return x / np.sqrt(np.mean(x ** 2) + 1e-20)


def amp(db):
    """Amplitude ratio of a level in decibels."""
    return 10 ** (np.asarray(db) / 20)


def scene():
    """The sources superpose close to the microphones, slightly left of centre."""
    work = grain_snaps() + stone_knocks() + scrubbing() + catches()
    work += singing() + touch_down() + handling()
    # the microphones differ by the sink's reflections and by friction from other points on the edge
    unlike = .45 * sink_reflections(work, decay=.005) + 1.1 * scrubbing()
    side = tinted(unlike, amp(along(WORK_WIDTH, HZ)))
    near = np.array([work + side, work - side]) + amp(-17) * kitchen_reverb(work, width=.3)
    pan_db = 1.15  # left over right
    return near * amp([[pan_db / 2], [-pan_db / 2]]) + kitchen_air(db=-68.0)


def record(dry):
    """Band limiting: the recorder thins the bass and keeps nothing above TOP_HZ."""
    return tinted(dry, amp(along(MICROPHONE_GAIN, HZ)) * (HZ < TOP_HZ))


dry = scene()
out = record(dry)
unload_audio(out)
```